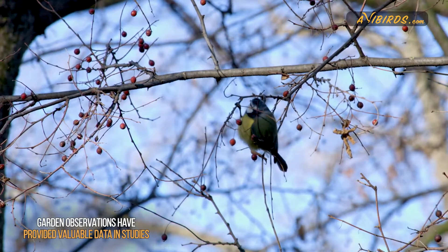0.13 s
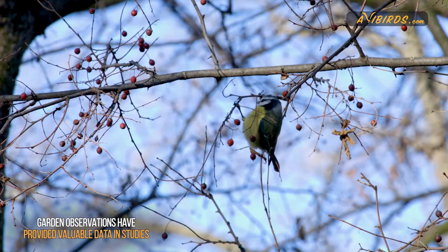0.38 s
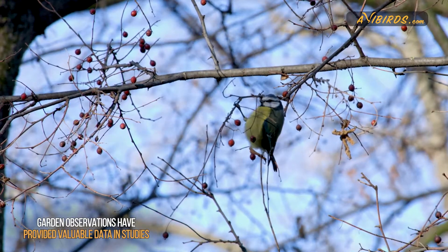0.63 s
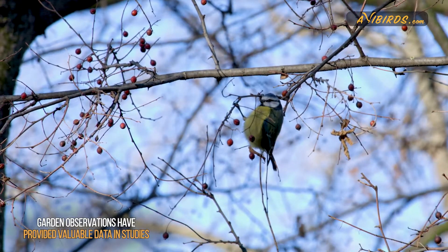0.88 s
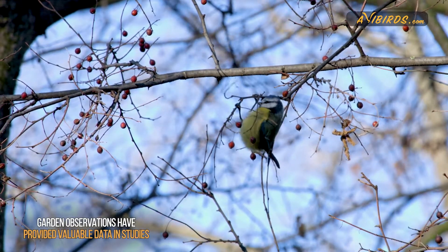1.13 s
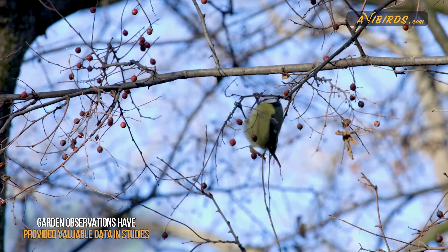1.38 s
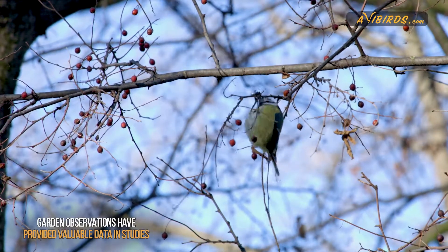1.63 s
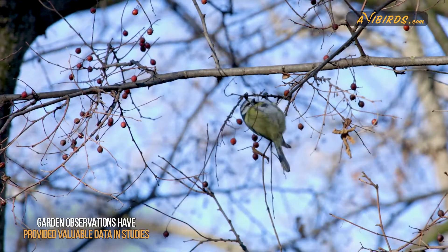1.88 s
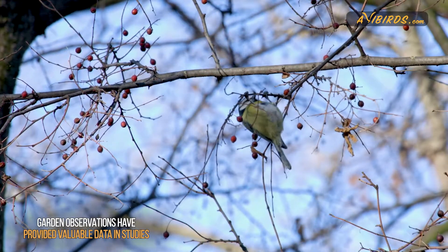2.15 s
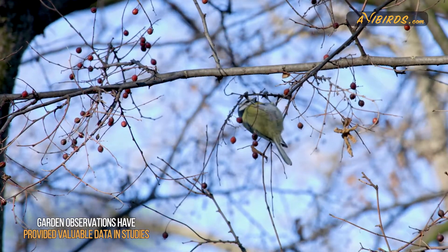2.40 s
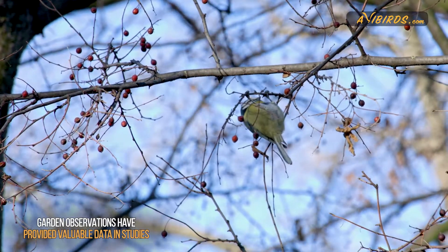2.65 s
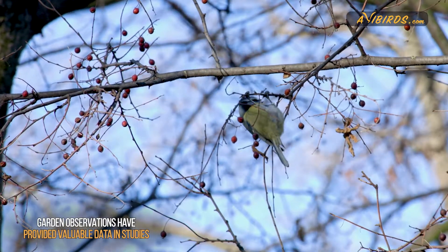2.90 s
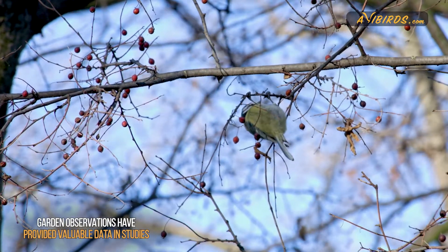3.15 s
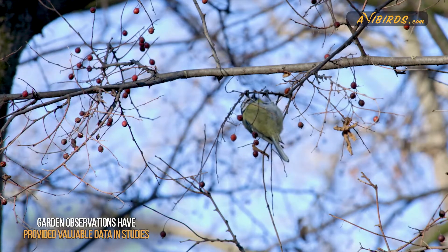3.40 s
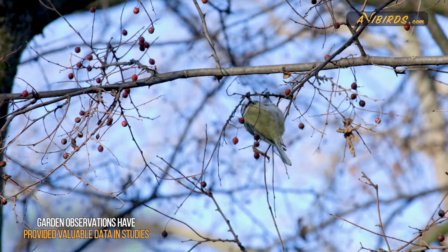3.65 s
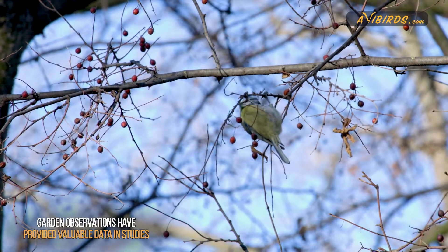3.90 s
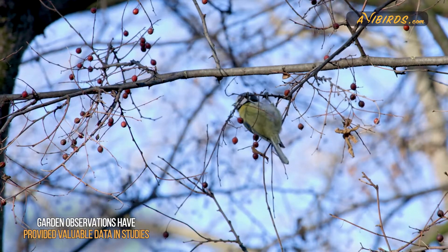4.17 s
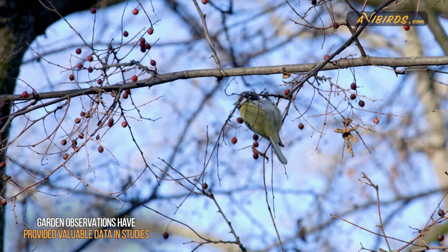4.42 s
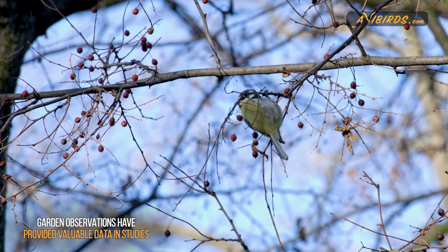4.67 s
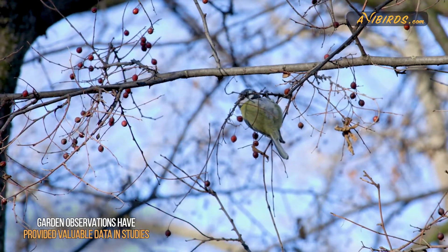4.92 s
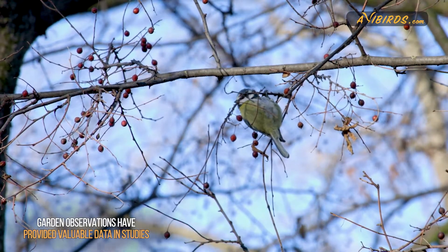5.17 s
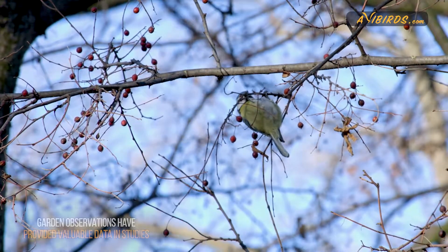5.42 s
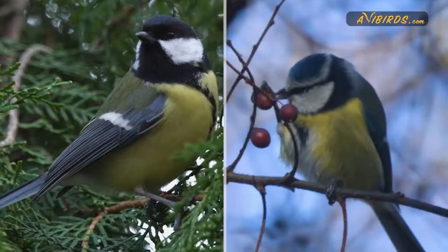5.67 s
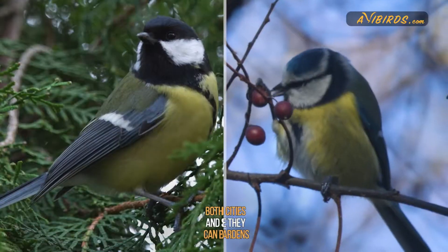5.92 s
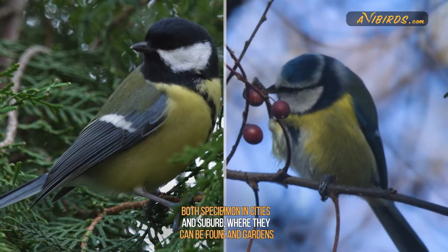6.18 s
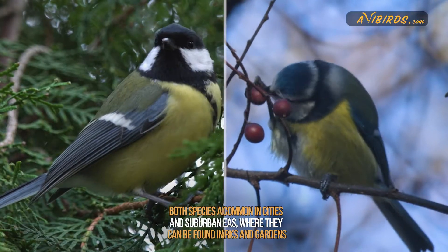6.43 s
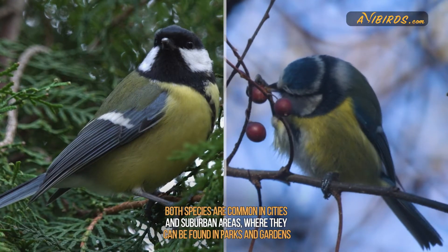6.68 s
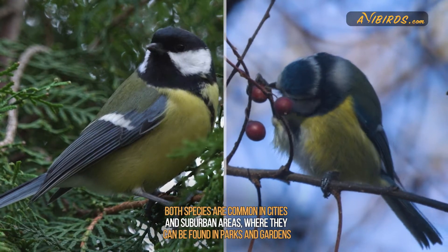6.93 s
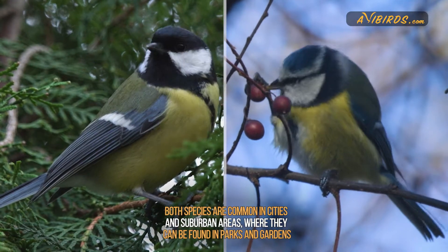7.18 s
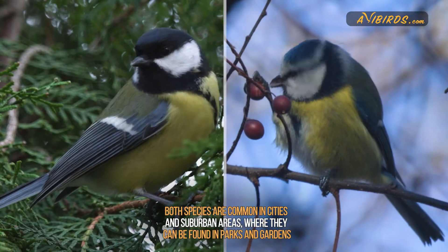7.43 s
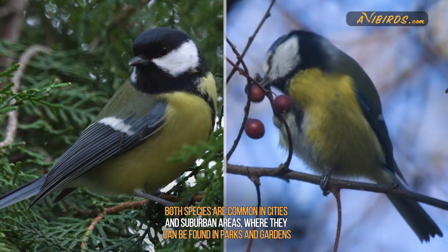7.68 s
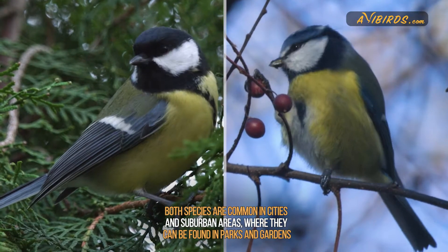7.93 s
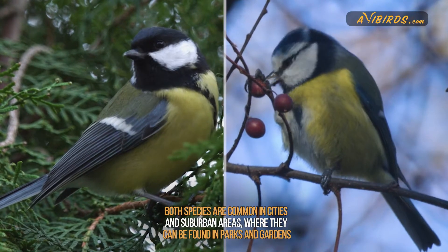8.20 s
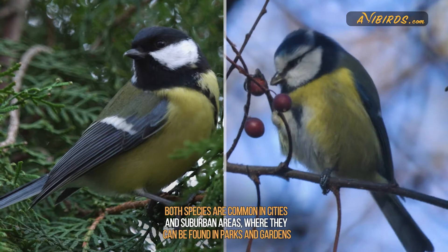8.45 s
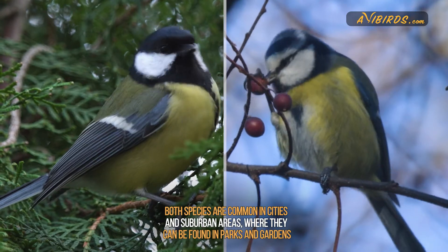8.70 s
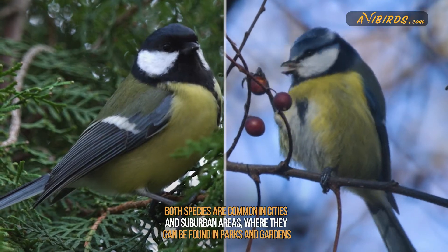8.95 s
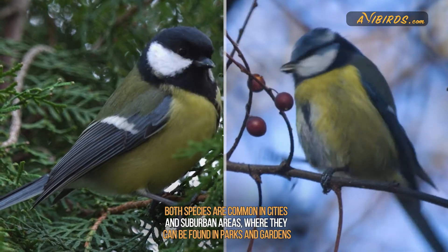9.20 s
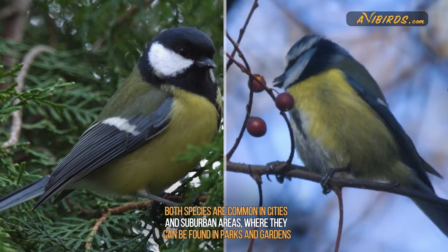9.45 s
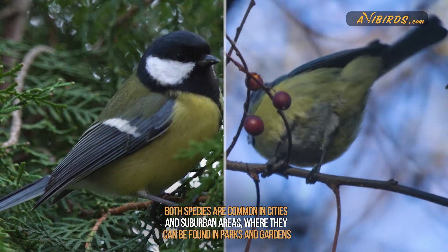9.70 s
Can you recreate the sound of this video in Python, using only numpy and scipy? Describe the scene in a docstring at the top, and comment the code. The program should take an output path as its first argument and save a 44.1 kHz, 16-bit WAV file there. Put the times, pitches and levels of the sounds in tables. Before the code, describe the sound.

A near, centred songbird dominates the first two seconds with sharp, high, rhythmic phrases, each a buzzy falling note, a pure whistle and a tiny low pipe, with short echoes off the trees. Afterwards it is silent and quiet distant birds take over: slurred whistles, chips and small trills, sparse at first, then livelier, then sparse again. A faint wide bed of distant traffic and air hiss runs throughout. A final, slightly softer close buzz comes right at the end.

```python
"""Songbird close by, woods behind

A small songbird close by, centred between two stereo channels, repeats a three-note phrase: a shaken, falling
buzz, a clear rising whistle, a soft low pipe. Farther birds whistle and trill among trees that echo them;
thin whistles lean left and a very distant chorus murmurs. Birdsong is sines with bent pitch and overtones,
echoed by sparse taps and scattered noise tails; distant traffic rumble and hiss are shaped noise."""
import sys
import numpy as np
from scipy import signal
from scipy.fft import rfft, irfft, next_fast_len
from scipy.io import wavfile
from scipy.ndimage import uniform_filter1d, map_coordinates

SR = 44100
rng = np.random.default_rng(int(sys.argv[2]) if len(sys.argv) > 2 else 0)


def ratio_of_db(decibels):
    """Turn decibels (scalar or array-like) into linear amplitude factors; 0 dB maps to 1."""
    return 10 ** (np.asarray(decibels, float) / 20)


def put_to_file(sound):
    """Save the sound as 16-bit audio at rate SR, in the file named by the first command-line argument."""
    columns = np.atleast_2d(sound).T  # one column per channel
    safe = np.clip(columns, -1, 1)
    whole_steps = np.round(safe * 32767)
    wavfile.write(sys.argv[1], SR, whole_steps.astype(np.int16))


N = 433503  # samples

# traffic and hiss, relative spectrum: (frequency [Hz], density [dB per Hz])
AIR_SPECTRUM = [(14, -42), (30, -4.5), (60, 0.5), (90, -7.5), (240, -11.5), (330, -18), (490, -15),
                (650, -24), (1000, -21.5), (2300, -26.5), (4200, -34.5), (4800, -45), (5600, -35.5),
                (8000, -35.5), (15800, -46)]
# narrow humming bands in the traffic: (centre [Hz], half-width [Hz], level [dB])
HUM_BANDS = [(56.5, 7, -50), (883.6, 31, -65)]
# left-right likeness of the background: (frequency [Hz], correlation [0-1])
STEREO_LIKENESS = [(30, 0.94), (90, 0.67), (180, 0.77), (330, 0.94), (700, 0.73), (1500, 0.96),
                   (2400, 0.98), (3600, 0.87), (4800, 0.53), (5350, 0.97), (12000, .97)]
# background, left over right: (frequency [Hz], level difference [dB])
STEREO_LEAN = [(70, -1), (400, 1.5), (1800, 0.2)]
# single strong echoes off trunks or walls, before each bird's own offset: (delay [s], level [dB])
TRUNK_ECHOES = [(.0045, -19), (.043, -18.5)]

# farther birds, straight glides and level whistles:
# (start [s], length [s], from [Hz], to [Hz], level [dB], loudest at [share 0-1])
FAR_GLIDES = [ (0.046, 0.073, 4060, 4270, -53, 0), (0.058, 0.027, 4120, 3000, -48, 0),
              (.105, 0.048, 5430, 4270, -57, 0.4), (0.103, 0.024, 4130, 2840, -51, 0.8),
              (0.168, .02, 4040, 3270, -54, .5), (0.278, 0.063, 4610, 4760, -55.5, .35),
              (0.3, 0.15, 3710, 3520, -44, 0.63), (2.316, 0.071, 5670, 4700, -63, 0.9),
              (2.428, 0.025, 2210, 3400, -49.5, 0.8), (2.533, 0.086, 1855, 1890, -61, 0),
              (2.563, 0.021, 2140, 2300, -50, 0.9), (2.593, .022, 2540, 2650, -48, .4),
              (2.631, 0.07, 2770, 2980, -53, 0.05), (2.757, 0.054, 5230, 4140, -58, 0.75),
              (3, .04, 3700, 4300, -59, .6), (2.997, 0.035, 4370, 4500, -59, .5),
              (3.226, 0.013, 2460, 3680, -58, 0.6), (3.669, 0.018, 3170, 4100, -52, .5),
              (4.001, 0.07, 3510, 3820, -62, 0.8), (4.073, 0.047, 3830, 4026, -43.5, 0.95),
              (4.113, 0.0082, 4050, 4500, -43, 0.3), (4.136, 0.018, 5540, 3560, -54, 0.7),
              (4.306, 0.013, 2900, 2120, -49, 0.7), (4.414, 0.018, 2910, 1890, -46.5, 0.55),
              (4.57, 0.14, 6250, 6250, -57.5, 0.1), (4.61, 0.011, 4800, 3300, -56, 0.5),
              (4.631, 0.18, 3195, 3230, -59, 0.5), (4.847, 0.039, 2480, 2560, -55, 0.1),
              (4.855, 0.012, 3350, 6160, -50, 1), (4.94, 0.11, 3150, 3310, -59, 0.7),
              (5.19, 0.02, 2200, 1810, -49, 0.4), (5.194, 0.0088, 1850, 2400, -51, .5),
              (3.548, .035, 2770, 2520, -52, .15), (5.533, 0.024, 3690, 5140, -50, 0.1),
              (5.571, 0.009, 4680, 3170, -43, 0.6), (4.836, .012, 6250, 5100, -58, .5),
              (4.848, .012, 5100, 6300, -53, .5), (4.94, 0.013, 5200, 5130, -58, .5),
              (7.43, 0.015, 5970, 5200, -55, 0.4), (8.382, 0.045, 2220, 2190, -59, .4),
              (7.099, 0.0092, 3880, 4540, -47, 0.7), (7.106, 0.058, 4120, 3680, -35, 0.35),
              (7.157, 0.073, 3392, 3350, -36, 0.2), (8.268, .04, 1520, 1280, -54, .5),
              (8.294, 0.015, 2280, 3460, -54, 0.8), (8.383, 0.05, 2630, 2694, -50, .2),
              (1.275, .048, 2880, 2960, -52, .6), (1.645, 0.064, 3170, 2890, -54, .5),
              (9.372, 0.025, 4540, 4710, -59, 0.1), (9.747, 0.059, 4300, 4360, -53, 0.8), ]
# farther birds, bowed notes: (start [s], length [s], from [Hz], middle [Hz], to [Hz], level [dB])
FAR_BOWS = [(1.174, 0.052, 2440, 2350, 2710, -45), (5.745, 0.026, 3730, 4000, 3650, -37.5),
            (6.049, 0.048, 3420, 3550, 2950, -39.5), (6.623, 0.056, 3380, 3717, 3550, -35)]
# farther birds, slurs that flick up and settle:
# (start [s], length [s], from [Hz], top [Hz], resting [Hz], level [dB], fade [dB])
FAR_SLURS = [(6.166, 0.18, 2320, 2867, 2424, -39, 0.5), (7.633, 0.061, 3600, 3765, 3150, -39, -2),
             (8.113, 0.067, 2400, 2650, 2590, -48, 9)]
# farther birds, winding notes, one table a note: (time [s], pitch [Hz], level [dB])
FAR_TUNES = [
    [(2.812, 3960, -54), (2.83, 3730, -56.5), (2.89, 3540, -60), (2.96, 3990, -58.5), (2.975, 3970, -61),
     (2.985, 3650, -68)],
    [(4.968, 2410, -56), (4.98, 2474, -42), (4.992, 2404, -43), (5.017, 2060, -46)],
    [(5.045, 2080, -62), (5.074, 2370, -45.5), (5.094, 2316, -40.5), (5.117, 2140, -49)],
    [(5.283, 4280, -43), (5.291, 3110, -46), (5.305, 3090, -48), (5.335, 3500, -37.5), (5.339, 3580, -50),
     (5.343, 4500, -60)],
    [(5.675, 5560, -60), (5.687, 6100, -48), (5.697, 4470, -59), (5.705, 5500, -56), (5.711, 4250, -53),
     (5.72, 4230, -44), (5.735, 4400, -46), (5.742, 4430, -61)],
    [(5.905, 3120, -41), (5.925, 3074, -37.5), (5.992, 2887, -51)],
    [(3.475, 2265, -58), (3.5, 2370, -50.5), (3.538, 2416, -45.5), (3.57, 2430, -50), (3.592, 2300, -47)],
    [(7.268, 4790, -60), (7.3, 4650, -53), (7.33, 4240, -37.5), (7.343, 4070, -40)],
    [(7.435, 3470, -76), (7.465, 3570, -47), (7.53, 3390, -36), (7.57, 3377, -37.5), (7.59, 3470, -60),
     (7.655, 3325, -47)],
    [(7.778, 2200, -47), (7.8, 2640, -38), (7.82, 2840, -36), (7.85, 2520, -40), (7.875, 2388, -39),
     (7.98, 2380, -49)],
    [(9.588, 3700, -55), (9.615, 3550, -56), (9.655, 3507, -49.5), (9.79, 3560, -60)],
    [(8.16, 3470, -70), (8.26, 3500, -61), (8.335, 3500, -56.5), (8.42, 3410, -67)],
    [(8.49, 3400, -61), (8.57, 3428, -50), (8.605, 3270, -56), (8.63, 3370, -59), (8.7, 3430, -61)],
    [(6.47, 4450, -50), (6.476, 3760, -40), (6.49, 3330, -41.5), (6.515, 3120, -40), (6.567, 2990, -41.5)],
    [(6.735, 5300, -47), (6.742, 6180, -52), (6.76, 5540, -47), (6.778, 4280, -62)],
    [(6.867, 2585, -43), (6.895, 2797, -36), (6.94, 2767, -38.5), (6.99, 3065, -43), (7.015, 3110, -43)],
]
# one farther bird with a strong octave: (start [s], length [s], pitch [Hz], level [dB])
FAR_REEDY = [(3.7, 0.066, 2940, -62)]
# its overtones from the octave up: level over the fundamental [dB]
REEDY_OVERTONES = [1.5]
# farther birds, trills:
# (start [s], length [s], centre pitch [Hz], level [dB], beats [per s], pitch swing either way [Hz])
FAR_TRILLS = [(0.17, 0.11, 3317, -50, 97, 300), (3.35, 0.13, 3426, -44.5, 48, 200),
              (5.861, 0.052, 3280, -41, 130, 220), (6.498, 0.088, 2630, -46, 63, 180),
              (6.645, 0.058, 2620, -45.5, 62, 200), (7.5, 0.17, 2490, -52, 53, 200),
              (9.575, 0.13, 2040, -51.5, 61, 300), (7.26, 0.044, 2370, -54, 61, 150)]

# near bird, falling buzzes: (start [s], length [s], top [Hz], dive time [s], landing [Hz],
# pitch sunk towards, before the sag [Hz], level before swell and pulses [dB], fade [dB])
NEAR_BUZZES = [(0.439, 0.11, 5710, 0.014, 4650, 3993, -12, 6),
               (0.858, 0.12, 5950, 0.017, 4640, 3935, -11.5, 7),
               (1.28, 0.12, 5880, 0.014, 4800, 4010, -12.5, 5.5),
               (1.699, 0.12, 5970, 0.017, 4720, 4074, -11.5, 8),
               (2.143, 0.12, 5750, 0.013, 4390, 4083, -12, 9),
               (9.778, 0.13, 5850, 0.015, 4920, 4000, -16, 3.5)]
# near bird, clear whistles: (start [s], length [s], pitch risen towards [Hz], level [dB], fade [dB])
NEAR_WHISTLES = [(0.639, 0.06, 3865, -16, 5), (1.047, 0.083, 3817, -14.5, 10), (1.465, 0.075, 3860, -15, 8),
                 (1.899, 0.066, 3848, -18, -1.5)]
# near bird, soft low pipes: (start [s], length [s], pitch before the droop [Hz], level [dB], fade [dB])
NEAR_PIPES = [(0.728, 0.044, 3057, -31.5, 10), (1.14, 0.046, 3097, -34.5, 1),
              (1.559, 0.047, 3057, -33.5, 8), (1.999, 0.039, 2995, -34, 1.5)]
# near bird's overtones from the second up: level relative to the fundamental [dB]
BUZZ_OVERTONES = [-32, -32, -43]
WHISTLE_OVERTONES = [-36.5, -40.5]
PIPE_OVERTONES = [-7, -27.5, -25.5]

# thin whistles from off to one side:
# (start [s], length [s], from [Hz], to [Hz], level [dB], left over right [dB])
SIDE_WHISTLES = [(.74, 0.16, 6500, 6520, -63, 12), (4.78, .03, 4050, 4350, -63, 11),
                 (5.08, 0.066, 4000, 4300, -63, 17), (5.71, .11, 6370, 6550, -63, 17)]

CHORUS_DB, CHORUS_SPREAD_DB = -65.5, 5  # faintest distant glide, before its echoes; range up to the loudest
GLIDE_ROUND = 0.89  # steepness of a glide's swell and fade
BOW_ATTACK, BOW_RELEASE = 0.54, 0.2  # shares of the note
SLUR_TOP, SLUR_FALL, SLUR_ATTACK, SLUR_RELEASE = 0.22, 0.4, 0.06, 0.1  # shares of the note
TUNE_ROUND_S, TUNE_EDGE = 0.0033, 0.015  # smoothing of bends; share of the note for each edge
TRILL_SCOOP_HZ, TRILL_SCOOP_S = 200, 0.0238  # a trill starts low
BUZZ_SINK_S, BUZZ_SAG_HZ_PER_S = 0.033, 300  # slow sinking under the quick dive; steady slip to the end
BUZZ_STAGGER_HZ, BUZZ_FLUTTER_DB = 40, 0.8  # the mean pitch and the level stumble
BUZZ_OVER_DB = 3.5  # overtones flare at the top of each shake
BUZZ_ATTACK_S, BUZZ_RELEASE_S, BUZZ_SWELL_DB, BUZZ_SWELL_S = 0.0028, 0.018, 15.5, 0.0078
WHISTLE_RISE_HZ, WHISTLE_RISE_S, WHISTLE_ATTACK_S, WHISTLE_RELEASE_S = 300, 0.0284, 0.013, 0.024
PIPE_DROOP_HZ, PIPE_ATTACK_S, PIPE_RELEASE_S = 140, 0.0019, 0.017


def unit(x):
    """Scaled to rms 1."""
    return x / np.sqrt(np.mean(x ** 2) + 1e-20)


def along(points, hz):
    """Reads (Hz, value) points on a log frequency axis."""
    f, v = np.transpose(points)
    return np.interp(np.log(hz + 1), np.log(f + 1), v)


def wobble(n, rate):
    """A smooth random curve of n samples, rate knots a second."""
    knots = rng.standard_normal(int(n * rate / SR) + 4)
    return map_coordinates(knots, [np.arange(n) * rate / SR])


def filtered(x, response):
    """x times a response of frequency."""
    m = next_fast_len(N + 8192)
    spectrum = rfft(x, m) * response(np.fft.rfftfreq(m, 1 / SR))
    return irfft(spectrum, m)[..., :N]


def add(track, s, sound):
    """Mixes a sound in at time s."""
    part = track[round(s * SR):][:len(sound)]
    part += sound[:len(part)]


def clock(length):
    """Seconds and share 0-1 through a note."""
    t = np.arange(0, length, 1 / SR)
    return t, t / length


def envelope(u, db, attack, release, fade_db):
    """Rounded attack, a hold that fades, release; u, attack and release share a unit, u ends with the note."""
    ramp = np.clip(np.minimum(u / attack, (u[-1] - u) / release), 0, 1)
    return ratio_of_db(db - fade_db * u / u[-1]) * np.sin(np.pi / 2 * ramp)


def voice(hz, level, tones):
    """The syrinx: a sine with overtones; level is the rms of the fundamental."""
    phase = 2 * np.pi * np.cumsum(hz) / SR
    over = 0
    for k, db in enumerate(tones, 2):
        audible = k * hz < SR / 2.8  # higher overtones are left out
        over = over + ratio_of_db(db) * np.sin(k * phase) * audible
    return np.sqrt(2) * level * (np.sin(phase) + over)


def woods(sound, wet_db, echo_db, t60, top_hz, late_db=-16, stir=0.37):
    """Single echoes plus a scattered tail from twigs and trunks, duller than the sound and new at each call."""
    t = np.arange(SR // 2) / SR
    early = ratio_of_db(-60 * t / t60) * (1 - np.exp(-t / 0.0014))
    late = ratio_of_db(late_db - 20 * t / t60) * (1 - np.exp(-t / 0.082))  # farther trees, three times as slow
    tail = rng.standard_normal(len(t)) * (early + late)
    answer = ratio_of_db(wet_db) * tail / np.linalg.norm(tail)
    for s, db in TRUNK_ECHOES:
        answer[round(s * SR)] += ratio_of_db(db + echo_db + rng.normal())
    leaves = signal.butter(2, top_hz, fs=SR, output="sos")  # leaves absorb the treble
    wet = signal.fftconvolve(sound, signal.sosfilt(leaves, answer))
    sway = np.exp(1j * stir * wobble(len(wet), 60))  # moving leaves blur the pitch of the answer
    analytic = signal.hilbert(wet, next_fast_len(len(wet)))[:len(wet)]
    wet = np.real(analytic * sway)
    add(wet, 0, sound)  # the direct sound
    return wet


def background():
    """Distant traffic rumble and hiss as shaped stereo noise with faint patches, and two narrow, wavering hums."""
    z = signal.stft(rng.standard_normal((2, N)), nperseg=512)[2]
    across_pitch = uniform_filter1d(rng.standard_normal(z.shape[1:]), 5, 0)
    patches_db = 1.05 * unit(uniform_filter1d(across_pitch, 14, 1))
    pair = signal.istft(z * ratio_of_db(patches_db), nperseg=512)[1][:, :N]

    def mid_side(hz):
        angle = np.arccos(np.clip(along(STEREO_LIKENESS, hz), -1, 1)) / 2
        return ratio_of_db(along(AIR_SPECTRUM, hz)) * [np.cos(angle), np.sin(angle)]

    mid, side = filtered(pair, mid_side)
    air = ratio_of_db(-43) * unit(np.array([mid + side, mid - side]))
    for hz, width_hz, db in HUM_BANDS:
        band = lambda f: np.exp(-((f - hz) / width_hz) ** 2)
        air = air + ratio_of_db(db) * unit(filtered(rng.standard_normal(N), band))
    return filtered(air, lambda hz: ratio_of_db(along(STEREO_LEAN, hz) * np.array([[0.5], [-0.5]])))


def chorus():
    """Many very distant birds blur into a murmur of short random glides."""
    out = np.zeros(N)
    for when, pitch, glide, length, size in rng.random((400, 5)):
        t = np.arange(0, 0.0126 + 0.0316 * length, 1 / SR)
        hz = 1700 * 2.2 ** pitch * (1 + 0.5 * (glide - 0.5) * t / t[-1])
        level = ratio_of_db(CHORUS_DB + CHORUS_SPREAD_DB * size) * np.hanning(len(t))
        add(out, when * N / SR, voice(hz, level, []))
    return woods(out, wet_db=-5.0, echo_db=6, t60=0.42, top_hz=8000)[:N]


def far_notes():
    """Start, pitch, level, peak dB and overtones of each distant note but the trills, each kind by its own rule."""
    for s, length, from_hz, to_hz, db, peak in FAR_GLIDES:
        t, u = clock(length)
        peak = np.clip(peak, 0.05, 0.95)
        swell = np.sin(np.pi / 2 * np.minimum(u / peak, (1 - u) / (1 - peak))) ** GLIDE_ROUND
        yield s, from_hz + (to_hz - from_hz) * u, ratio_of_db(db) * swell, db, []
    for s, length, from_hz, mid_hz, to_hz, db in FAR_BOWS:
        t, u = clock(length)
        bow_hz = 2 * (2 * mid_hz - from_hz - to_hz) * u * (1 - u)
        level = envelope(u, db, BOW_ATTACK, BOW_RELEASE, fade_db=0.5)
        yield s, from_hz + (to_hz - from_hz) * u + bow_hz, level, db, []
    for s, length, from_hz, top_hz, rest_hz, db, fade_db in FAR_SLURS:
        t, u = clock(length)
        up = np.sin(np.pi / 2 * np.clip(u / SLUR_TOP, 0, 1))
        down = np.sin(np.pi / 2 * np.clip((u - SLUR_TOP) / SLUR_FALL, 0, 1)) ** 2
        hz = from_hz + (top_hz - from_hz) * up - (top_hz - rest_hz) * down
        yield s, hz, envelope(u, db, SLUR_ATTACK, SLUR_RELEASE, fade_db), db, []
    for tune in FAR_TUNES:
        s, knot_hz, db = np.transpose(tune)
        t, u = clock(s[-1] - s[0])
        bends = np.interp(t + s[0], s, knot_hz)
        hz = uniform_filter1d(bends, max(1, int(TUNE_ROUND_S * SR)), mode="nearest")
        level = np.interp(t + s[0], s, ratio_of_db(db)) * envelope(u, 0, TUNE_EDGE, TUNE_EDGE, 0)
        yield s[0], hz, level, max(db), []
    for s, length, hz, db in FAR_REEDY:
        t, u = clock(length)
        level = envelope(u, db, SLUR_ATTACK, SLUR_RELEASE, fade_db=3.0)
        yield s, hz + 0 * u, level, db, REEDY_OVERTONES


def far_birds():
    """Distant whistles waver with the air, the faintest most, and echo more; a trill is a string of upstrokes."""
    out = np.zeros(N)
    for s, hz, level, db, tones in far_notes():
        far_db = -25.5 - db  # the fainter, the farther
        level = level * ratio_of_db(0.05 * far_db * wobble(len(hz), 61.0))
        hz = hz + 18 * wobble(len(hz), 69.8)  # an unsteady throat
        note = woods(voice(hz, level, tones), wet_db=-7.0 + 0.17 * far_db, echo_db=-4.5,
                     t60=0.25, top_hz=8000, late_db=-4.5, stir=0.81)
        add(out, s, note)
    for s, length, hz, db, rate, swing_hz in FAR_TRILLS:
        t, u = clock(length)
        beat = (rate * t) % 1  # share through each upstroke
        swell = np.sin(np.pi * beat) * np.sin(np.pi * u ** 0.88)
        level = ratio_of_db(db + 3.1 * wobble(len(t), 63.3)) * swell
        hz = hz - TRILL_SCOOP_HZ * np.exp(-t / TRILL_SCOOP_S) + swing_hz * (2 * beat - 1)
        add(out, s, woods(voice(hz, level, []), wet_db=0.0, echo_db=-32, t60=0.38, top_hz=8000))
    return out


def buzz(length, top_hz, dive_s, land_hz, end_hz, db, fade_db):
    """A whistle shaken fast in pitch, the shake slowing and widening and pulsing the level."""
    t, u = clock(length)
    n = len(t)
    hz = end_hz + (land_hz - end_hz) * np.exp(-t / BUZZ_SINK_S)
    hz = hz + (top_hz - land_hz) * np.clip(1 - t / dive_s, 0, 1) ** 1.1
    hz = hz - BUZZ_SAG_HZ_PER_S * (t - length / 2) + BUZZ_STAGGER_HZ * wobble(n, 57.4)
    rate = 240 - 220 * t + 7 * wobble(n, 93)  # shakes a second
    turn = 2 * np.pi * (np.cumsum(rate) / SR + 0.18)
    shake = np.sin(turn)
    swing_hz = (240 + 1100 * t) * ratio_of_db(0.7 * wobble(n, 200))
    pulse_db = 1.2 * np.sin(turn + 2.4) - 1.7 * shake ** 2  # louder low and rising, weaker at the turns
    swell_db = -BUZZ_SWELL_DB * np.exp(-t / BUZZ_SWELL_S)
    level = envelope(t, db, BUZZ_ATTACK_S, BUZZ_RELEASE_S, fade_db)
    level = level * ratio_of_db(pulse_db + swell_db + BUZZ_FLUTTER_DB * wobble(n, 226))
    flare_db = BUZZ_OVER_DB * (shake - 0.5)
    tones = [d + flare_db + 1.4 * wobble(n, 250) for d in BUZZ_OVERTONES]
    return voice(hz + swing_hz * shake, level, tones)


def near_bird():
    """Shaken buzzes, whistles whose rise levels off, and pipes that droop, each with a quieter answer from the woods."""
    out, near = np.zeros(N), dict(t60=0.3, top_hz=6030)
    for s, *shape in NEAR_BUZZES:
        add(out, s, woods(buzz(*shape), wet_db=-14.5, echo_db=-5.5, **near))
    for s, length, end_hz, db, fade_db in NEAR_WHISTLES:
        t, u = clock(length)
        hz = end_hz - WHISTLE_RISE_HZ * np.exp(-t / WHISTLE_RISE_S) + 8 * wobble(len(t), 76)
        level = envelope(t, db, WHISTLE_ATTACK_S, WHISTLE_RELEASE_S, fade_db)
        add(out, s, woods(voice(hz, level, WHISTLE_OVERTONES), wet_db=-14.0, echo_db=-1, **near))
    for s, length, hz, db, fade_db in NEAR_PIPES:
        t, u = clock(length)
        level = envelope(t, db, PIPE_ATTACK_S, PIPE_RELEASE_S, fade_db)
        note = voice(hz - PIPE_DROOP_HZ * u ** 3, level, PIPE_OVERTONES)
        add(out, s, woods(note, wet_db=-11.0, echo_db=6.5, **near))
    return out


def side_birds():
    """Soft even whistles placed off-centre by a level difference between the channels."""
    out = np.zeros((2, N))
    for s, length, from_hz, to_hz, db, lean_db in SIDE_WHISTLES:
        t, u = clock(length)
        hz = from_hz + (to_hz - from_hz) * np.sqrt(u)
        note = voice(hz, envelope(u, db, 0.34, 0.28, fade_db=5.0), [])
        note = woods(note, wet_db=-19, echo_db=-4, t60=0.48, top_hz=8000)
        add(out[0], s, ratio_of_db(lean_db / 2) * note)
        add(out[1], s, ratio_of_db(-lean_db / 2) * note)
    return out


def scene():
    """Most birds straight ahead, a few thin whistles to the side, background spread."""
    return background() + chorus() + far_birds() + near_bird() + side_birds()


def top_cut(x):
    """Nothing passes above the cut-off."""
    return signal.sosfilt(signal.butter(12, 15990, fs=SR, output="sos"), x)


def record(dry):
    """The finished stereo mix as the recorder keeps it."""
    return top_cut(dry)


dry = scene()
out = record(dry)
put_to_file(out)
```